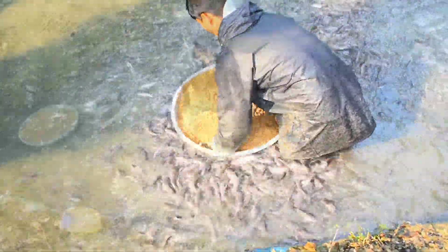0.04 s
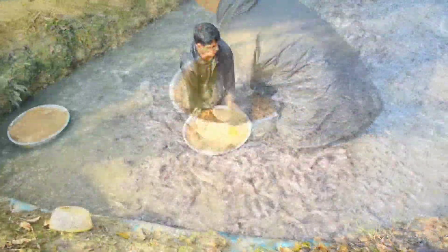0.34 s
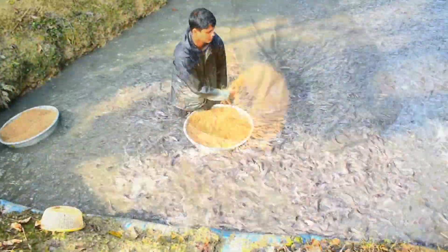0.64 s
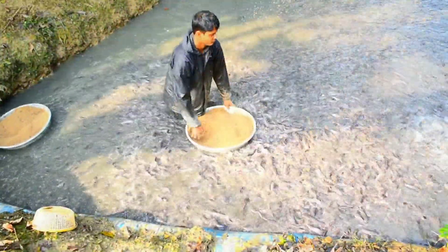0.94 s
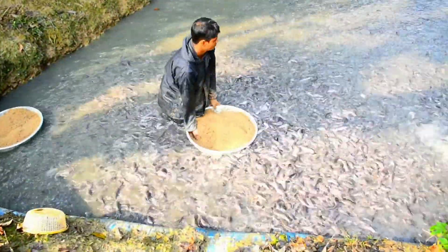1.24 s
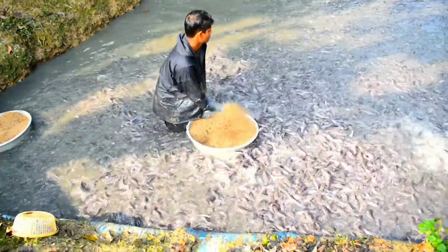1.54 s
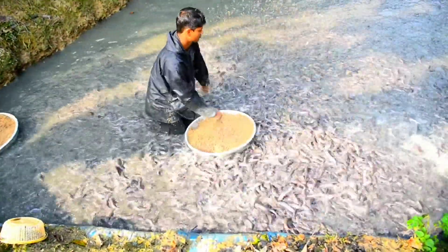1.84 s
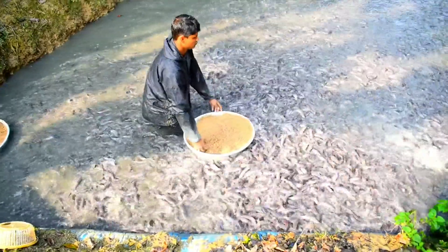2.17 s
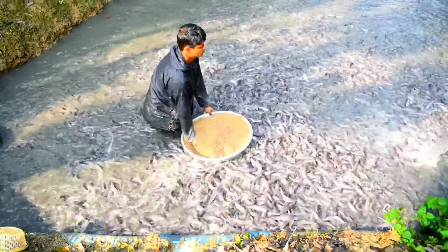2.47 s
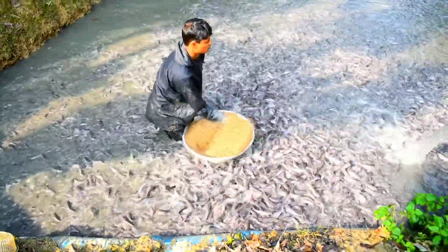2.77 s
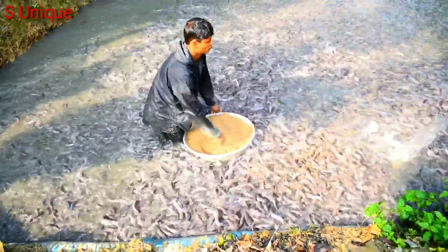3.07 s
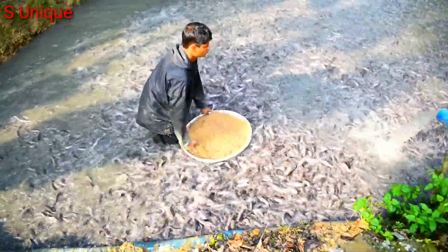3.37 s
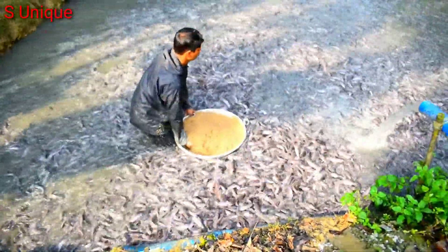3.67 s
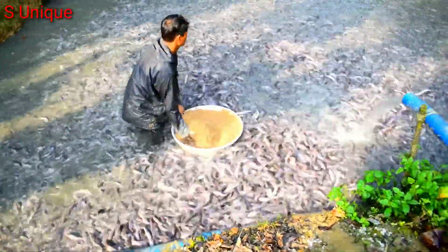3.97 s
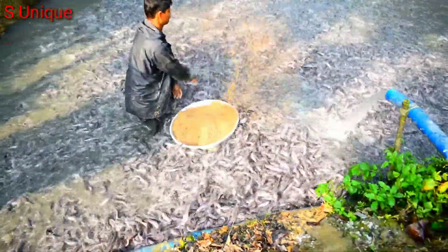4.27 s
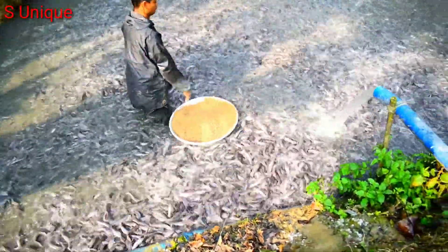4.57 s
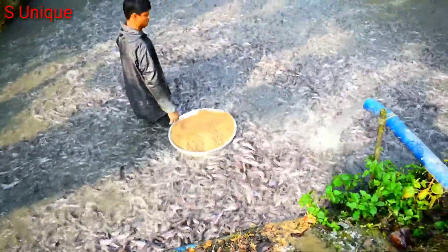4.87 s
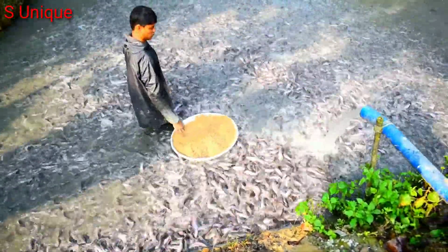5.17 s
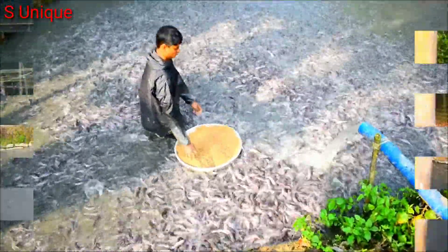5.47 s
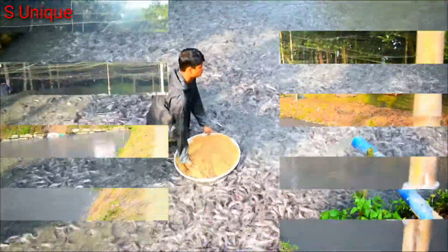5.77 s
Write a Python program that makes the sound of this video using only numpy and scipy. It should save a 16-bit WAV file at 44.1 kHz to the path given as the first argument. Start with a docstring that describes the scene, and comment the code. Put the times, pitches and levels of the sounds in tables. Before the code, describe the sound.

A pump engine thumps in a quick, even beat under the dense splashing and tail slaps of fish feeding in shallow water.

```python
"""A crowd of fish thrashes at the surface of a shallow pond at feeding time, all around the microphone.
Tail flicks churn up bubbles and throw spray, harder as the frenzy builds; single slaps stand out.
Nearby, dead centre, a slow one-cylinder engine, probably a water pump, chugs 8.4 times a second.
Each thump ducks the microphone's gain; the whole sound sinks, swells, holds and sinks again."""
import sys
import numpy as np
from scipy import signal
from scipy.fft import rfft, irfft, next_fast_len
from scipy.io import wavfile
from scipy.ndimage import uniform_filter1d, minimum_filter1d

SR = 44100
rng = np.random.default_rng(int(sys.argv[2]) if len(sys.argv) > 2 else 0)


def int16_out(signal):
    """Quantize to a 16-bit WAV file."""
    q = np.round(np.clip(np.atleast_2d(signal).T, -1, 1) * 32767)
    wavfile.write(sys.argv[1], SR, q.astype(np.int16))


N = 265482
TIME_S = np.arange(N) / SR
HOLD_GAIN_DB = -27.5  # overall gain while the level holds

# spectrum of churned water: pitch_hz, level_db
CHURN_SPECTRUM = [(32, -44), (80, -10.5), (200, 0), (300, 1.5), (550, -1.5), (800, -3.5), (1400, 2.5),
                  (2300, -4.5), (3800, -13.5), (5300, -17.5), (9000, -22), (16000, -42)]
# spectrum of spray: pitch_hz, level_db
SPRAY_SPECTRUM = [(500, -30), (2000, 12), (4000, 3), (5500, -5.5), (8500, -9.5), (11500, -15), (14000, -17),
                  (15500, -20)]


def amp(db):
    """Decibels to gain."""
    return 10 ** (np.asarray(db) / 20)


def unit(x):
    """Scale to rms 1."""
    return x / np.sqrt(np.mean(x ** 2) + 1e-20)


def gain_at(spectrum, hz):
    """Gain between (pitch_hz, level_db) points on a log frequency axis."""
    pitch_hz, level_db = np.transpose(spectrum)
    return amp(np.interp(np.log(hz + 1), np.log(pitch_hz + 1), level_db))


def filtered(x, response):
    """x through a complex frequency response."""
    n = x.shape[-1]
    size = next_fast_len(n + SR // 4)
    return irfft(rfft(x, size) * response(np.fft.rfftfreq(size, 1 / SR)), size)[..., :n]


def coloured(x, spectrum):
    """x shaped by the spectrum, at rms 1."""
    return unit(filtered(x, lambda hz: gain_at(spectrum, hz)))


def pulse(spectrum, size=4096):
    """The causal pulse of peak 1 that has this spectrum."""
    cepstrum = irfft(np.log(gain_at(spectrum, np.fft.rfftfreq(size, 1 / SR))))
    cepstrum[1:size // 2] *= 2
    cepstrum[size // 2 + 1:] = 0
    shape = irfft(np.exp(rfft(cepstrum)))
    return shape / np.abs(shape).max()


def play(times, sizes, shape):
    """One copy of shape at each time, scaled by its size."""
    at = np.round(times * SR).astype(int) + SR
    inside = (at >= 0) & (at < N + SR)
    impulses = np.bincount(at[inside], sizes[inside], N + SR)
    return signal.fftconvolve(impulses, shape)[SR:SR + N]


def burst(rise_s, t60_s):
    """Envelope of peak 1 that swells and dies away."""
    t = np.arange(SR // 4) / SR
    shape = (1 - np.exp(-t / rise_s)) * amp(-60 * t / t60_s)
    return shape / shape.max()


def varied(sizes, scatter_db):
    """The sizes, each a little louder or softer at random."""
    return sizes * amp(scatter_db * rng.standard_normal(len(sizes)))


def stereo(mid, side):
    """Left and right at the microphone: alike in the bass, further apart in the treble."""
    # stereo width of the water: pitch_hz, side_gain_db
    width = [(60, -41), (150, -47), (380, -16.5), (950, -14.5), (2380, -17), (5980, -9), (15000, -7.5)]
    side = filtered(side, lambda hz: gain_at(width, hz))
    return np.array([mid + side, mid - side])


def swell_db(t):
    """Overall level against the hold: sinks, climbs, steps up, holds with one crest, steps down, fades."""
    lull_s, hold_from_s, hold_to_s = 0.68, 1.717, 5.336
    sink_db_per_s, climb_db_per_s, fade_db_per_s = 10, 7.5, 8.5
    step_db, step_s = 3, 0.18
    sink = sink_db_per_s * np.maximum(lull_s - t, 0)
    climb = climb_db_per_s * np.clip(hold_from_s - t, 0, hold_from_s - lull_s)
    outside_hold_s = np.maximum(hold_from_s - t, t - hold_to_s)
    step = step_db * np.clip(outside_hold_s / step_s + .5, 0, 1)
    crest = 2 * np.exp(-((t - 2.83) / 0.17) ** 2)
    fade = fade_db_per_s * np.maximum(t - hold_to_s, 0)
    return sink - climb - step + crest - fade


def firings():
    """Time and strength of every exhaust thump; the beat shifts its step between even stretches."""
    # stretches of even chugging: start_s, end_s, fade_in_s, fade_out_s, one_thump_s, period_s
    stretches = [(-1, .68, .01, .4, .0380, .11836), (.62, 2.0, .4, .01, .7648, .11869),
                 (2.0, 7, .01, .01, 2.0470, .11894)]
    rows = []
    for start, end, fade_in, fade_out, one_thump, period in stretches:
        beats = one_thump + period * np.arange(-8, 40)
        share = np.clip((beats - start) / fade_in + .5, 0, 1)
        share *= np.clip((end - beats) / fade_out + .5, 0, 1)
        rows.append(np.array([beats, np.sqrt(share)])[:, share > 0])
    times, sizes = np.hstack(rows)
    return times + rng.normal(0, 0.00011, len(times)), sizes


def exhaust(times, sizes):
    """A valve cracks open with a low boom, the pipe thumps, and a softer tap follows."""
    # spectrum of the exhaust puff: pitch_hz, level_db
    puff_spectrum = [(25, -57), (55, -11), (110, -15.5), (220, -7.5), (330, -3), (540, 1.5), (660, -2.5),
                     (830, -13.5), (1400, -35.5), (2200, -26.5), (6000, -67)]
    # paths of the puff, turned over by the open pipe end: delay_s, gain
    paths = [(0, .52), (.0039, -1.0), (.0108, -.36)]
    # spectrum of the opening valve: pitch_hz, level_db
    crack_spectrum = [(25, -21), (80, -9), (380, -21), (500, 2.5), (600, 7.5), (720, -6), (1050, -7.5),
                      (1700, -17), (6000, -94)]
    valve_s, boom_hz = times - .0325, 94
    puff, force = pulse(puff_spectrum), varied(sizes, .6)
    thump = amp(21.5) * sum(gain * play(times + delay, force, puff) for delay, gain in paths)
    crack = amp(16) * play(valve_s, varied(sizes, 1.6), pulse(crack_spectrum))
    tap = amp(6) * play(times + .032, varied(sizes, 1.5), puff)
    envelope = burst(rise_s=0.013, t60_s=0.089) ** 2
    low_tone = envelope * np.sin(2 * np.pi * boom_hz * TIME_S[:len(envelope)])
    boom = amp(-6) * play(valve_s - .003, varied(sizes, 0.89), low_tone)
    return thump + crack + tap + boom


def clatter(times, sizes):
    """Piston and valve gear knock on the block: part rings alike each cycle, part rattles anew."""
    # metal knocks of one cycle: before_thump_s, gain
    knocks = [(.059, 1.0), (.051, .75), (.031, .5), (.007, .35)]
    # spectrum of the struck block: pitch_hz, level_db
    block_spectrum = [(200, -15), (300, -8), (520, 5), (760, -4), (900, 3.5), (1080, -2), (1400, -4.5),
                      (2000, -12.5), (5000, -26), (12000, -50)]
    decay = burst(rise_s=.0015, t60_s=.14)
    metal = lambda n: coloured(rng.standard_normal(n), block_spectrum)
    ring = sum(gain * play(times - lead, varied(sizes, 0.67), decay * metal(len(decay)))
               for lead, gain in knocks)
    power = sum(play(times - lead, (gain * sizes) ** 2, decay ** 2) for lead, gain in knocks)
    rattle = np.sqrt(np.abs(power)) * metal(N)
    emphasis = amp(-0.33 * swell_db(TIME_S))  # the knocks stand out when the whole is quieter
    return emphasis * (amp(-1.5) * ring + rattle)


def frame_drone(times, sizes):
    """Each firing sets the engine's frame and pipework ringing."""
    # resonances of frame and pipework: pitch_hz, width_hz, level_db
    modes = [(56, 32, -8), (107.3, 7.3, -3), (158.5, 28, -9), (195.4, 5.2, -18), (268.8, 5, 12),
             (304.7, 15.7, 10), (413, 130, -16), (583, 14.3, 5), (636, 46, -7), (1019, 16, 5.5),
             (1227, 9, -6)]
    mode = lambda hz, pitch, width: 1j * hz * width / (pitch ** 2 - hz ** 2 + 1j * hz * width)
    response = lambda hz: sum((-1) ** k * amp(db) * mode(hz, pitch, width)
                              for k, (pitch, width, db) in enumerate(modes))
    kicks = play(times, varied(sizes, 0.76), [1.0])
    return amp(-3.5) * unit(filtered(kicks, response))


def bubbles(low_hz, high_hz, cycles, spread_db, count, samples):
    """A cloud of bubbles, each ringing briefly and rising in pitch; rms 1."""
    when, pitch, chance = rng.random((count, 3)).T[:, :, None]
    hz = low_hz * (high_hz / low_hz) ** pitch
    k = np.arange(samples)
    age = hz * k / SR / cycles
    strength = amp(-spread_db * np.log(np.maximum(chance, .004))) * hz
    phase = 2 * np.pi * cycles * age * (1 + 0.12 * np.minimum(age, 2))
    rings = strength * np.exp(-3 * age) * np.sin(phase)
    at = (when * N).astype(int) + k
    return unit(np.bincount(at.ravel(), rings.ravel(), N + samples)[:N])


def flicks(per_s, spread_db, t60_s):
    """Envelope of many overlapping tail flicks, rms 1."""
    when, chance = rng.random((int(per_s * N / SR), 2)).T
    sizes = amp(-spread_db * np.log(np.maximum(chance, .01)))
    power = play(when * N / SR, sizes ** 2, burst(rise_s=0.0048, t60_s=t60_s) ** 2)
    return unit(np.sqrt(np.abs(power)))


def shoal():
    """Flicks churn the water into bubbles and throw up droplets that patter back."""
    arousal_s, feed_s, feed_rise_s = 1.8, 1.79, .05
    calm = np.exp(-TIME_S / arousal_s)  # as it wears off, the fish thrash harder and throw more spray
    waiting = np.clip((feed_s - TIME_S) / feed_rise_s + .5, 0, 1)
    thrash_db = -3.5 - 2.5 * calm - waiting  # jumps 1 dB as a handful of feed lands
    spray_db = 2.5 - 8.5 * calm
    stir = flicks(per_s=1000, spread_db=0.3, t60_s=0.23)
    large_bubbles = lambda: bubbles(250, 4500, cycles=14, spread_db=2, count=12000, samples=400)
    small_bubbles = lambda: bubbles(2000, 10000, cycles=3, spread_db=3, count=20000, samples=48)
    churn = lambda: coloured(1.2 * rng.standard_normal(N) + large_bubbles(), CHURN_SPECTRUM)
    fizz = lambda: coloured(1.15 * rng.standard_normal(N) + small_bubbles(), SPRAY_SPECTRUM)
    body = amp(6) * stereo(churn(), churn())
    spray = amp(spray_db) * flicks(per_s=540, spread_db=-0.7, t60_s=0.18) * stereo(fizz(), fizz())
    return amp(thrash_db) * stir * (body + spray)


def tail_slaps():
    """A tail hits the surface: a sharp smack, a gush of water and a short spatter."""
    # single tail slaps: start_s, relative_level_db
    slaps = [(1.775, -13), (1.8, -9.5), (2.01, -12), (2.0832, -11), (2.396, -6), (2.4694, -10),
             (2.678, -12), (2.8, -9), (3.68, -8), (3.9154, -10), (5.2894, -10)]
    # spectrum of a tail striking water: pitch_hz, level_db
    smack_spectrum = [(150, -21), (900, 5), (2200, -9), (5000, -14), (9000, -23), (15000, -45)]
    times, level_db = np.transpose(slaps)
    sizes = amp(level_db - HOLD_GAIN_DB - swell_db(times))  # slaps do not follow the overall swell
    water = lambda spectrum: stereo(*coloured(rng.standard_normal((2, N)), spectrum))
    smack = amp(-11) * play(times, sizes, pulse(smack_spectrum))
    gush = amp(-19) * play(times, sizes, burst(rise_s=0.0015, t60_s=0.15)) * water(CHURN_SPECTRUM)
    spatter = amp(-21.5) * play(times, sizes, burst(rise_s=.001, t60_s=0.044)) * water(SPRAY_SPECTRUM)
    return smack + gush + spatter


def scene():
    """At the pond: the engine nearby in the centre, the fish all around the microphone."""
    times, sizes = firings()
    engine = exhaust(times, sizes) + clatter(times, sizes) + frame_drone(times, sizes)
    return engine + shoal() + tail_slaps()


def record(dry):
    """The microphone's gain ducks briefly on loud blows; then the slow swell, low cut and band limit."""
    threshold_db, low_cut_hz, top_hz = 11.5, 44, 15500
    power = uniform_filter1d(dry.mean(0) ** 2, SR // 200)
    level = np.sqrt(np.abs(power) + 1e-12)
    needed = np.minimum(amp(threshold_db) / level, 1)
    hold = SR // 42  # the gain stays down for about 24 ms
    held = minimum_filter1d(needed, hold, origin=(hold - 1) // 2)
    easing = np.hanning(SR // 160)
    ducking = 1 + signal.lfilter(easing / easing.sum(), 1, held - 1)
    low_cut = signal.butter(3, low_cut_hz, "highpass", fs=SR, output="sos")
    sound = signal.sosfilt(low_cut, dry * ducking * amp(HOLD_GAIN_DB + swell_db(TIME_S)))
    return filtered(sound, lambda hz: hz < top_hz)


dry = scene()
out = record(dry)
int16_out(out)
```